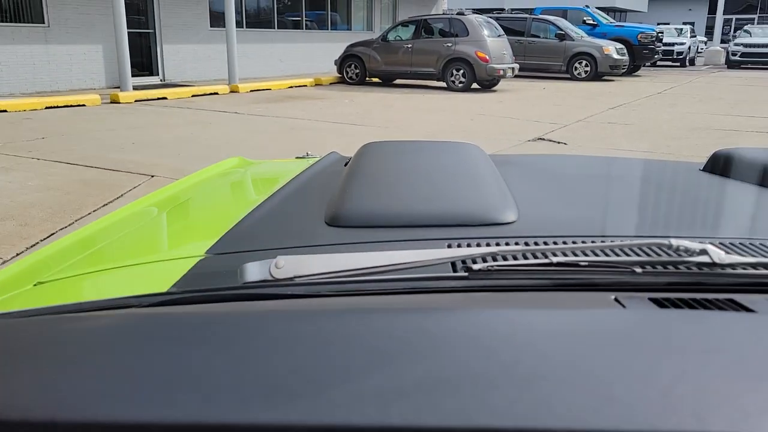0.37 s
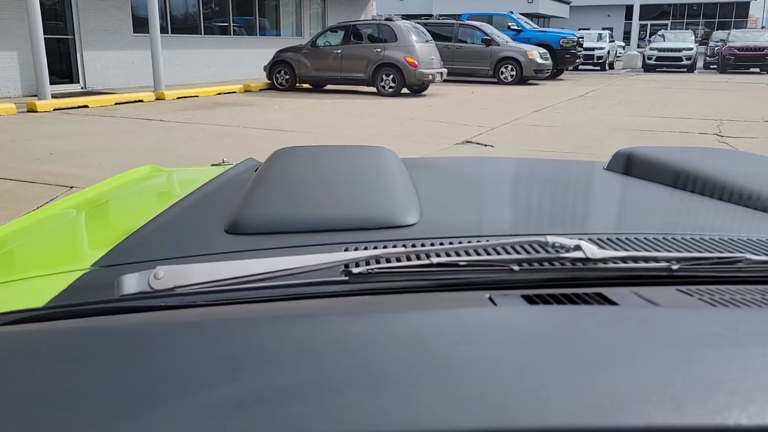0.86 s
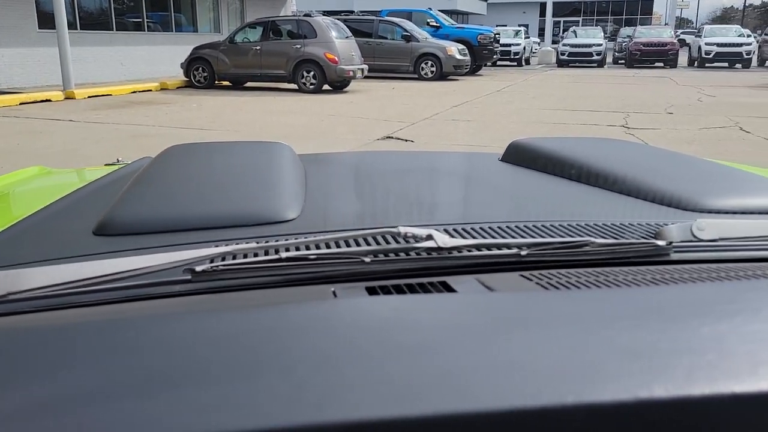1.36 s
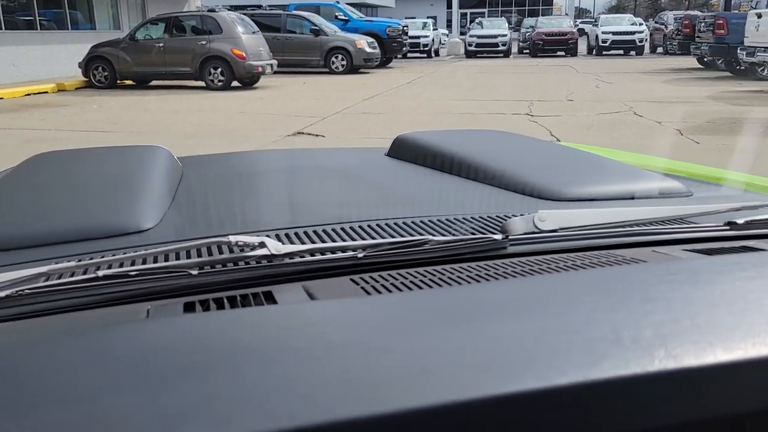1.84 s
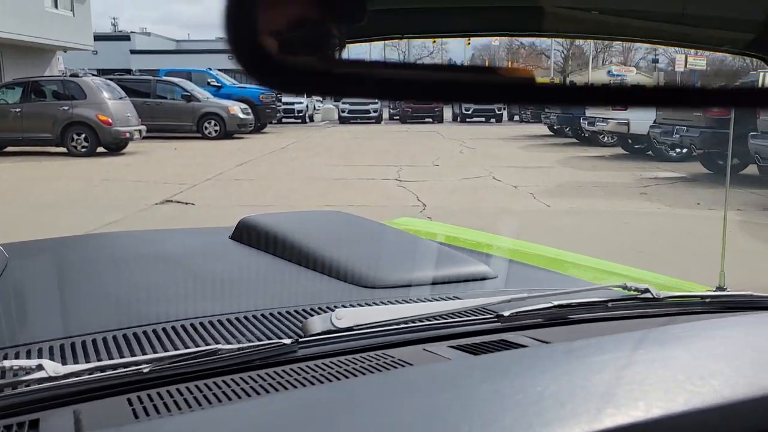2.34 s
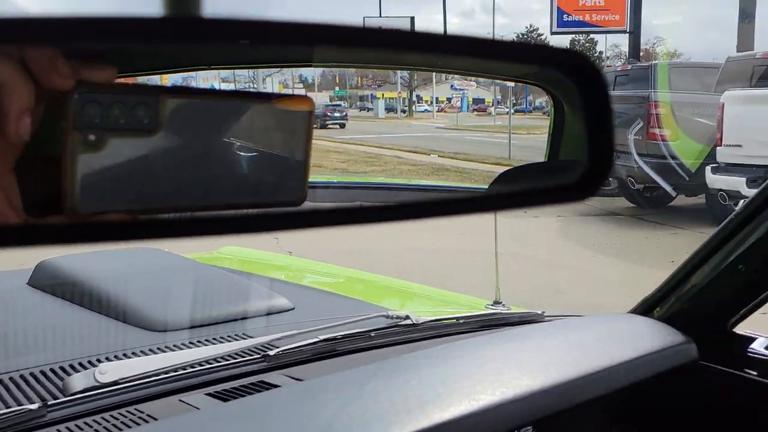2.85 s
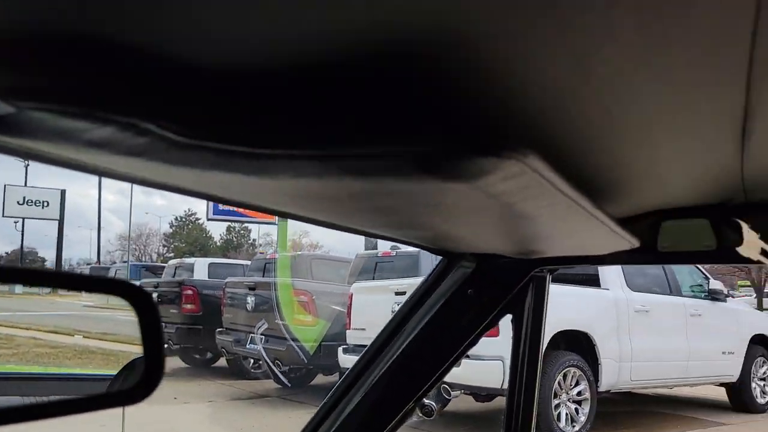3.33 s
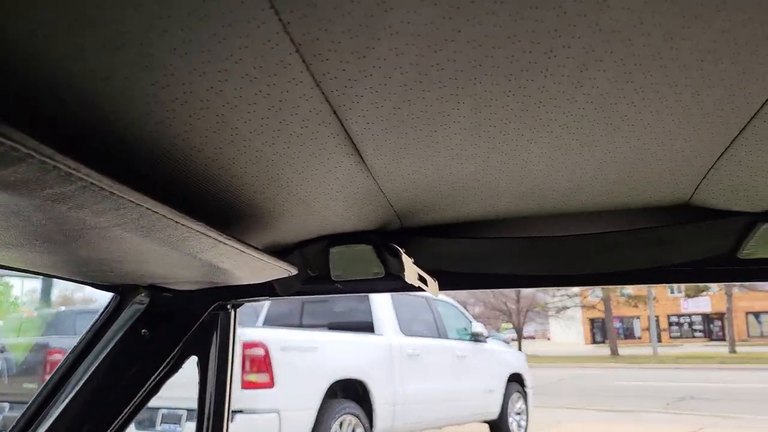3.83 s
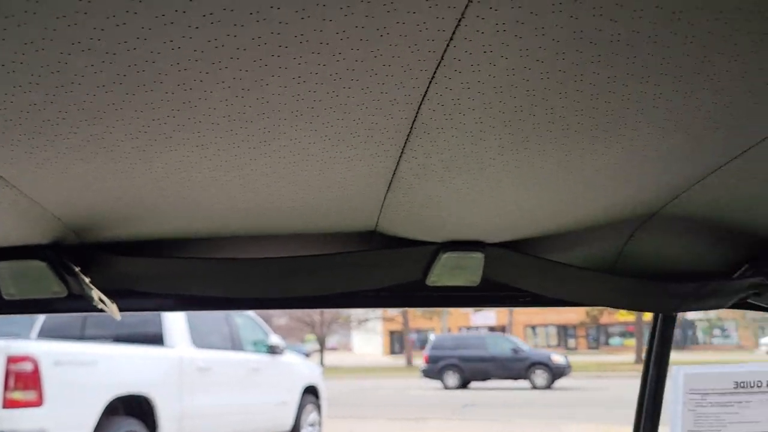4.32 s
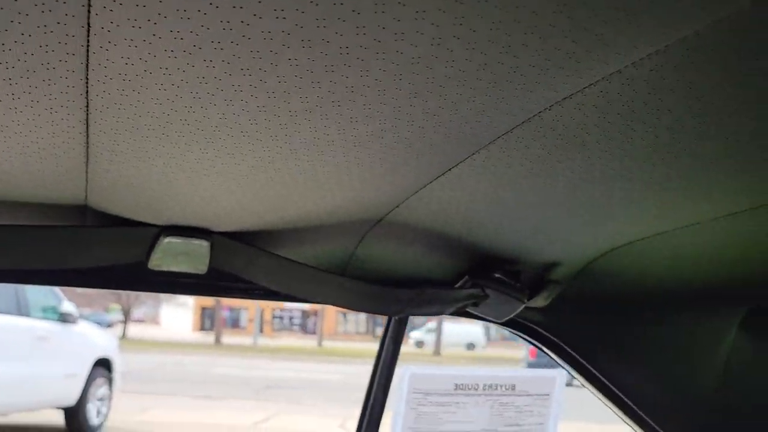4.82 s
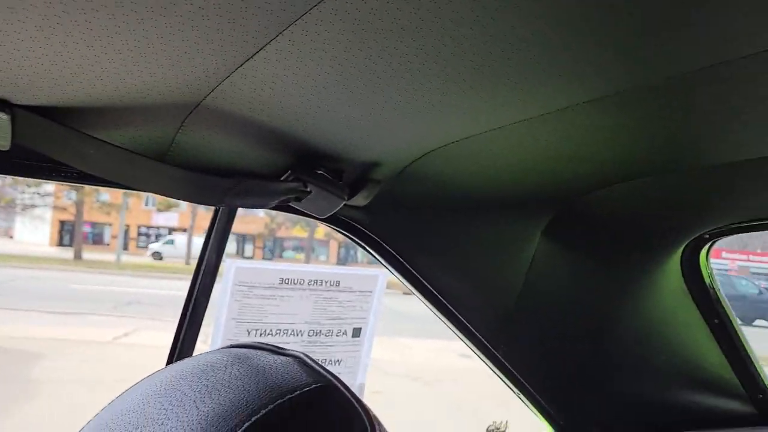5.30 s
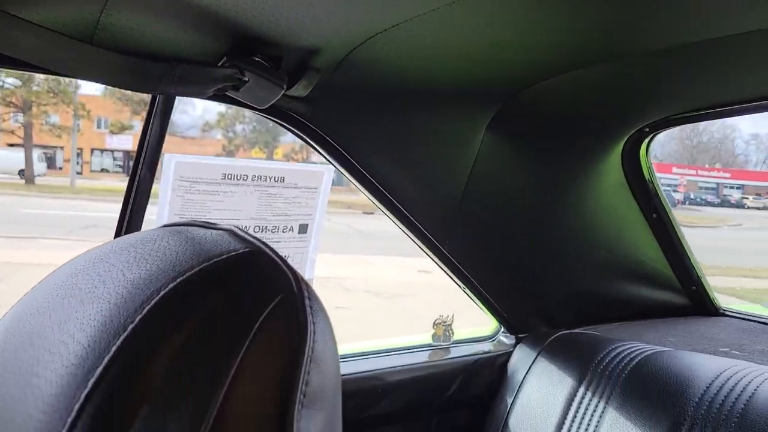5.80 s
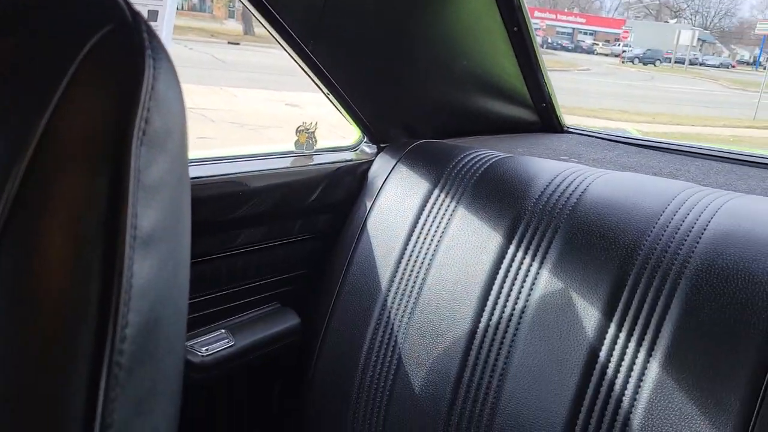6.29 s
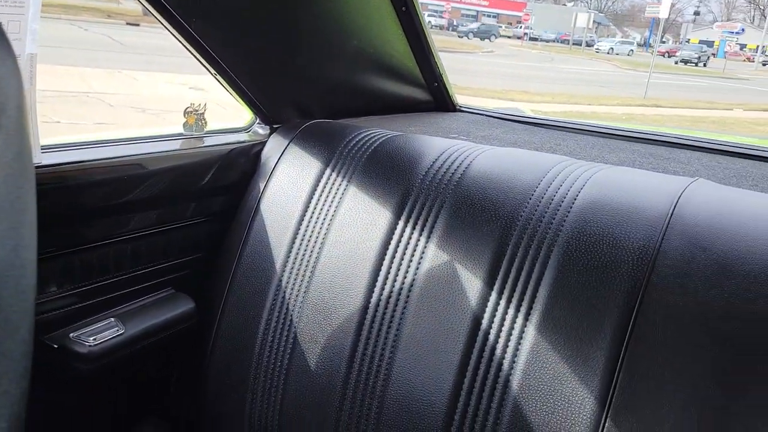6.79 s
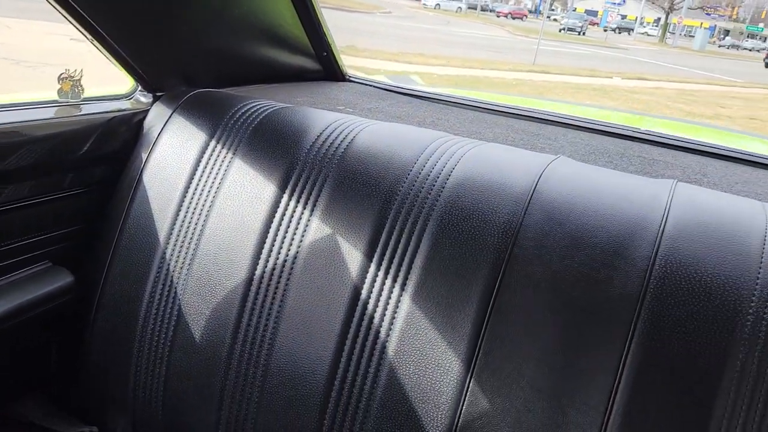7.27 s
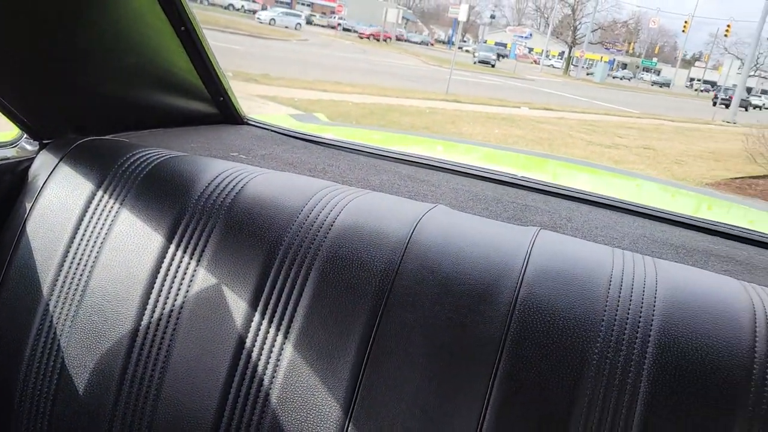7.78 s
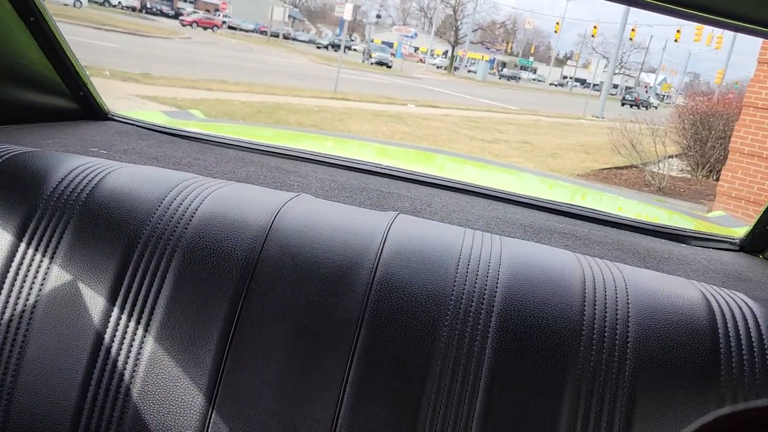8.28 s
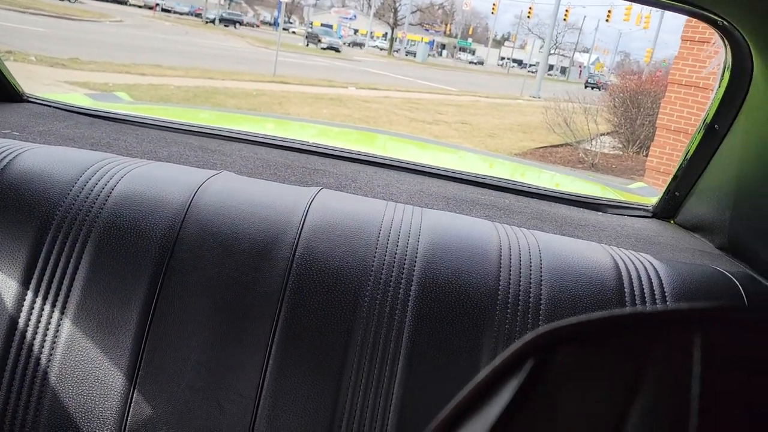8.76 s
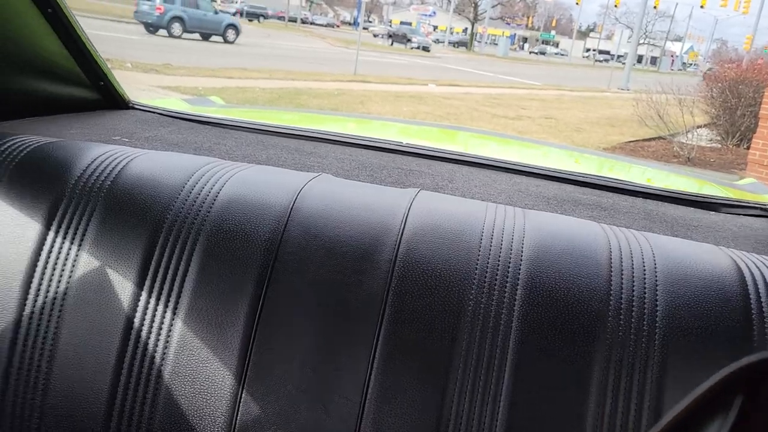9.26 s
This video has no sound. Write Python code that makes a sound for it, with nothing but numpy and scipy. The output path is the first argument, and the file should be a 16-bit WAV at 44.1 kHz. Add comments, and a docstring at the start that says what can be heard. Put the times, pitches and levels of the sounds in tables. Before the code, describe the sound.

A close, bass-heavy V8 idle fills the cabin of a parked older car from start to finish, heard on a hand-held stereo phone at the driver's seat. At 0 s it is fast, cold and slightly harsh, a firing tone near 100 Hz with uneven throbs; by about 2 s it drops to around 91 Hz and becomes lumpier, with a deeper half-rate boom, then drifts slightly up and down, dipping near 6 and after 8.5 s. Muffled fan and valve noise swells gently underneath. A faint seat rub comes at 1 s, a dry trim tick at 2.1, a barely audible far horn from 2.2 to 2.7. Cloth brushes at 2.9, 4.1, 5.7, 7.2, 8.7 and 9.2; a grainy vinyl rub with small knocks lands near 4.2, another knock at 8.8. Soft tyre hiss passes around 6.8 and 8.6. The idle continues to the end, about 9.4 s.

```python
"""Cold V8 at fast idle, from the driver's seat

Heard on a hand-held phone that turns from windscreen to rear bench, one port leading as it turns.
Exhaust: sines at orders of the eight-cylinder cycle, plus uneven blows ringing the cabin air.
Engine bay, street, sleeve and seat vinyl: shaped noise. Trim tick: decaying modes. Far horn: held
sine partials. Passing cars: swells of tyre hiss."""
import sys
import numpy as np
from scipy import signal
from scipy.fft import rfft, irfft, next_fast_len
from scipy.io import wavfile
from scipy.ndimage import uniform_filter1d, minimum_filter1d, map_coordinates

SR = 44100
rng = np.random.default_rng(int(sys.argv[2]) if len(sys.argv) > 2 else 0)


def unload_wav(signal):
    """Save mono or channel-first audio to the path in sys.argv[1] as 16-bit WAV at rate SR, clipped to [-1, 1]."""
    wavfile.write(
        sys.argv[1],
        SR,
        np.round(np.clip(np.atleast_2d(signal).T, -1, 1) * 32767).astype(np.int16),
    )


def attenuation_scalar(level_db):
    """Turn a level in dB into a linear amplitude multiplier (20 dB per decade)."""
    decades = np.asarray(level_db, float) / 20
    return 10 ** decades


N = 413658
TIME = np.arange(N) / SR
# relative colour of engine-bay and tyre noise: (frequency [Hz], density [dB per Hz])
BAY_COLOUR = [(330, -36), (400, -27.5), (550, -32), (680, -34.5), (740, -33.5), (950, -39), (1500, -42),
              (1890, -42), (1970, -40.5), (2060, -44), (3300, -47.5), (3800, -53), (6500, -55.5),
              (7800, -67)]


def curves(table):
    """Columns of a time table, one value per sample."""
    s, *columns = np.transpose(table)
    return [np.interp(TIME, s, column) for column in columns]


def shape(table, hz):
    """A (Hz, value) table read on a log-frequency axis."""
    f, v = np.transpose(table)
    return np.interp(np.log(np.maximum(hz, 1)), np.log(f), v)


def filtered(x, gain):
    """Apply gain(Hz) to the spectrum; mirrored ends keep start and finish apart."""
    size = next_fast_len(N + SR // 5)
    lead = (size - N) // 2
    wide = np.pad(x, (lead, size - N - lead), mode="reflect")
    hz = np.arange(size // 2 + 1) * SR / size
    return irfft(rfft(wide) * gain(hz), size)[lead:lead + N]


def unit(x):
    """Scale to rms 1."""
    return x / np.sqrt(np.mean(x ** 2))


def walk(rate_hz):
    """Random levels held 1 / rate_hz and slewed twice; rms 1."""
    k = int(SR / rate_hz)
    steps = np.repeat(rng.standard_normal(N // k + 1), k)
    return unit(uniform_filter1d(uniform_filter1d(steps, k), k)[:N])


def bump(s, length_s):
    """Bell-shaped swell centred on s, length_s wide at 1/e."""
    return np.exp(-(2 * (TIME - s) / length_s) ** 2)


def sides(pan_db):
    """Gains of the two ports for a left minus right level."""
    return attenuation_scalar(np.array([pan_db, -pan_db]) / 2)


def ports(x):
    """One wave reaches the two ports at slightly different times as the phone turns."""
    # (time [s], left port lead [ms])
    turn = [(0, 0.44), (1, 0.31), (3, 0.33), (4, -0.025), (6.5, -0.37), (8, -0.43)]
    half_lead = curves(turn)[0] * SR / 2000  # samples
    return np.array([map_coordinates(x, [np.arange(N) + side * half_lead], order=3, mode="mirror")
                     for side in (1, -1)])


def cabin(x):
    """The cabin smears a sound into a short tail; towards the treble the ports hear unlike reflections."""
    t60_s, alike_hz = .2, 280
    t = TIME[:SR // 2]
    tails = rng.standard_normal((3, len(t))) * np.exp(-np.log(1000) * t / t60_s)
    common, left, right = (signal.fftconvolve(x, tail)[:N] for tail in tails)
    unlike = lambda f: f / np.sqrt(f ** 2 + alike_hz ** 2)
    alike = ports(filtered(common, lambda f: np.sqrt(1 - unlike(f) ** 2)))
    return unit(alike + np.array([filtered(left, unlike), filtered(right, unlike)]))


def noise(colour, lo_hz, hi_hz):
    """Coloured noise in one range, part from one side and part diffuse; rms 1."""
    # power from one side rather than all round: (frequency [Hz], share [0-1])
    direct_share = [(400, 0.74), (1000, 0.39), (2500, 0.16), (6000, 0.1), (14000, 0.05)]
    direct = lambda f: np.clip(shape(direct_share, f), 0, 1)
    diffuse = lambda f: 1 - direct(f)
    edge = lambda f: 1 / np.sqrt((1 + (lo_hz / (f + 1)) ** 16) * (1 + (f / hi_hz) ** 16))

    def band(share):
        gain = lambda f: attenuation_scalar(shape(colour, f)) * edge(f) * np.sqrt(share(f))
        return filtered(rng.standard_normal(N), gain)
    return unit(ports(band(direct)) + np.array([band(diffuse) for _ in range(2)]))


def exhaust(uneven_db, slip_rad, drone_slip_rad, echo_db):
    """Orders of the two-turn cycle; uneven burning lets each waver in size and timing."""
    # (time [s], firing rate [Hz])
    speed = [(0.05, 99.5), (0.8, 98), (1.1, 95.8), (2.0, 91.7), (2.3, 91.6), (2.6, 89.7), (3.8, 90.8),
             (4.1, 89.9), (4.4, 91.1), (5.0, 91.4), (5.6, 89.6), (5.9, 87.8), (6.2, 87.4), (6.5, 89.6),
             (7.4, 91.6), (8.0, 90.7), (8.6, 87.3), (9.3, 87.3)]
    # cabin resonances at the phone: (time [s], firing tone [dB], nominal one-bank boom [dB],
    # floor-pan drone lift [dB], ringing panel [Hz], panel lift [dB])
    idle = [(0.1, -12.7, -29, 0, 280, 3), (1.4, -11.6, -24, 0, 272, 5), (2.2, -10.9, -20.5, 2, 268, 14),
            (2.7, -12.3, -17, 3, 266, 14), (4.4, -13, -16, 0, 266, 6), (5.3, -12.9, -16, -1, 262, 3),
            (6.1, -13.4, -16.5, -1, 262, 5), (7.3, -11.9, -17.5, -1, 262, 7), (8.4, -13.4, -16, 0, 273, 10),
            (9.0, -13.3, -17.5, 1, 275, 14)]
    # weaker harmonics from uneven cylinders: (order of cycle, level once settled [dB])
    cycle_orders = [(3, -37), (5, -26), (6, -37.5), (7, -38.5), (9, -31.5), (10, -41.5), (11, -40.5),
                    (12, -40), (13, -38), (14, -45), (15, -42.5), (16, -42)]
    # orders 17-34 through floor pan and pipes: (level at fast idle [dB], level once settled [dB])
    drone_orders = [(-35.5, -46.5), (-43, -49.5), (-40, -42.5), (-47.5, -44.5), (-27.5, -48), (-40, -45),
                    (-39, -41), (-39, -44.5), (-50.5, -45), (-42.5, -48.5), (-44, -48), (-38.5, -43.5),
                    (-37.5, -40.5), (-54, -49.5), (-55.5, -52.5), (-59, -56), (-58.5, -57.5),
                    (-53.5, -56.5)]
    # orders that show while cold: (order, level at fast idle [dB], level once settled [dB])
    upper_orders = [(36, -45, -58), (44, -50, -60), (45, -50, -60)]
    # uneven blows after pipes and floor pan: (frequency [Hz], relative density [dB per Hz])
    blow_colour = [(25, -21), (45, -5), (100, 1.5), (130, -11), (220, -7.5), (262, -5), (330, -10),
                   (420, -24.5), (700, -60.5)]
    # cabin air modes: (centre [Hz], half width [Hz], level once settled [dB], lift at fast idle [dB])
    air_modes = [(42, 2, -33, 3), (97, 3, -35, 0)]
    # (time [s], left minus right level of the boom [dB])
    lean = [(0.05, -0.5), (1.2, -2.3), (3.2, -0.8), (4.9, -2.1), (7.5, -2.3), (8.7, -1.6), (9.3, -1.8)]
    settled_hz, fast_hz, cold_hz = 91.4, 94.3, 96.7  # highest orders fully out above cold_hz
    hunt_share, panel_half_width_hz = .002, 9.4
    pipe_bend_rad = 1.48  # times order squared: the pipes delay each order differently
    bank_side_share = .1  # lowest boom fills the right port a little more

    hz = curves(speed)[0] * (1 + hunt_share * walk(5))
    firing_db, bank_db, drone_db, ring_hz, ring_db = curves(idle)
    fast = np.clip((hz - settled_hz) / (fast_hz - settled_hz), 0, 1)
    cold = np.clip((hz - settled_hz) / (cold_hz - settled_hz), 0, 1)
    cycle = 2 * np.pi * np.cumsum(hz) / SR / 8

    def order(k, db, waver_rad, rate_hz):
        # body paths scramble phases above order 9, but orders 20-25 ring together once a cycle
        start = 0
        if k < 20 or k > 25:
            start = pipe_bend_rad * k ** 2 + (k > 9) * 2 * np.pi * rng.random()
        return np.sqrt(2) * attenuation_scalar(db) * np.cos(k * cycle + start + waver_rad * walk(rate_hz))

    # a harder-working bank of four raises its boom and lowers the even firing tone
    tilt = walk(13) + .7 * walk(6)
    tilt = unit(tilt - uniform_filter1d(tilt, SR // 2))  # evens out within half a second
    firing_tone = order(8, firing_db - tilt + .5 * walk(9), .15, 9)
    bank = order(4, bank_db - 1 - fast + (2.3 + 1.5 * fast) * tilt, .15, 7)
    # the fast, cold engine burns more harshly: orders above 6 stand out
    uneven = sum(order(k, db + 2.0 * fast * (k > 6) + uneven_db * walk(4), slip_rad, 6)
                 for k, db in cycle_orders)

    drone = 0
    for k, fast_db, slow_db in [(k, *row) for k, row in enumerate(drone_orders, 17)] + upper_orders:
        haste = cold if k > 32 else fast
        panel_db = ring_db * np.exp(-((k * hz / 8 - ring_hz) / panel_half_width_hz) ** 2)
        db = slow_db + haste * (fast_db - slow_db) + drone_db + panel_db + 2 * walk(4)
        drone = drone + order(k, db, drone_slip_rad * k / 24, 4)
    drone = ports(drone) + attenuation_scalar(echo_db) * np.std(drone) * cabin(drone)

    # each firing hits with its own strength, which fills the gaps between the orders
    firing = (cycle * 8 / (2 * np.pi)).astype(int)
    blows = np.diff(firing, prepend=0) * rng.standard_normal(N // 100)[firing]
    rumble = unit(filtered(blows, lambda f: attenuation_scalar(shape(blow_colour, f))))
    echoes = attenuation_scalar(-30.5 + 1.4 * cold + 0.22 * drone_db) * cabin(rumble)
    air = 0
    for mode_hz, width_hz, db, lift_db in air_modes:
        mode = filtered(blows, lambda f: 1 / (1 + ((f - mode_hz) / width_hz) ** 2))
        air = air + attenuation_scalar(db + lift_db * cold) * unit(mode)

    boom = firing_tone + bank + uneven + air + attenuation_scalar(-30.5 + 3.7 * cold + 0.6 * drone_db) * rumble
    pan_db, = curves(lean)
    bank_offset = bank_side_share * np.array([[-1], [1]]) * bank
    return ports(boom) * sides(pan_db) + bank_offset + drone + echoes, cycle, fast


def engine_bay(cycle, fast, throb_db, flicker_db):
    """Fan, intake and valve gear through the bulkhead, with traffic: noise throbbing with the cycle."""
    # ranges, rumble to valve clatter: (base level [dB], lift at fast idle [dB], share of swell [0-1])
    bay = [(-40.5, -0.5, 0.2), (-43, 3, 0.8), (-42, 1.5, 0.94), (-47.5, 2.5, 0.2), (-52.5, 0, .5)]
    # edges of those ranges [Hz]
    edges_hz = (345, 620, 950, 2300, 3600, 9000)
    # bay and street swell as the phone moves through the cabin: (time [s], full swell [dB])
    swell = [(0, 3.5), (1.5, 0.5), (2.8, 3), (3.45, -1), (4.7, 3), (5.6, -0.5), (6.7, -1.5), (7.6, 1),
             (8.2, 4), (9.38, 3.5)]
    throb = throb_db * np.sin(cycle + walk(3))
    swell_db, = curves(swell)
    out = 0
    for (db, fast_db, share), lo_hz, hi_hz in zip(bay, edges_hz, edges_hz[1:]):
        level_db = db + fast_db * fast + share * swell_db + throb + flicker_db * walk(16)
        out = out + attenuation_scalar(level_db) * noise(BAY_COLOUR, lo_hz, hi_hz)
    return out


def cloth(flicker_db):
    """Sliding fabric: fine hiss and coarser scrape as two noise bands sharing a random flutter."""
    # steady sleeve brushing: (time [s], hiss level [dB], left minus right level [dB])
    sleeve = [(0, -56, 2), (2.3, -58.5, -0.5), (3.5, -61.5, -1), (6.4, -55, -3.5), (7.5, -55.5, -7),
              (8.9, -52, -5), (9.38, -53.5, -8.5)]
    # separate rubs against the phone: (time [s], length [s], hiss level [dB], scrape level [dB],
    # left minus right level [dB])
    rustle = [(2.864, 0.29, -46, -56, -2), (4.084, 0.24, -54, -51, -1), (5.744, 0.58, -63.5, -52, -0.5),
              (7.228, 0.37, -55, -50.5, 2.5), (8.662, 0.14, -53.5, -60, -1.5),
              (9.204, .3, -55.5, -65, -3.5)]
    # (frequency [Hz], relative density [dB per Hz])
    cloth_colour = [(2350, -37.5), (4380, -9), (5990, -10), (8430, -15), (10900, -9), (12800, -4.5),
                    (15600, -8)]
    # scrape from first to second edge, hiss from second to third [Hz]
    edges_hz = (3600, 7500, 18000)
    sleeve_scrape_db = -0.5  # relative to its hiss
    db, pan_db = curves(sleeve)
    hiss_power = (attenuation_scalar(db) * sides(pan_db)) ** 2
    scrape_power = hiss_power * attenuation_scalar(sleeve_scrape_db) ** 2
    for s, length_s, hiss_db, scrape_db, pan_db in rustle:
        rub = (sides(pan_db)[:, None] * bump(s, length_s)) ** 2
        hiss_power = hiss_power + attenuation_scalar(hiss_db) ** 2 * rub
        scrape_power = scrape_power + attenuation_scalar(scrape_db) ** 2 * rub
    lo_hz, mid_hz, hi_hz = edges_hz
    flutter = attenuation_scalar(flicker_db * walk(28))
    scrape = np.sqrt(scrape_power) * noise(cloth_colour, lo_hz, mid_hz)
    hiss = np.sqrt(hiss_power) * noise(cloth_colour, mid_hz, hi_hz)
    return flutter * (scrape + hiss)


def vinyl(grain_db, apart):
    """Seat vinyl: grainy bursts of band-passed noise, partly unlike at the two ports."""
    # rubs and short knocks as the driver turns: (time [s], length [s], level [dB], lowest [Hz],
    # highest [Hz])
    rubs = [(1.04, .14, -45, 2950, 3450), (4.17, .24, -37.5, 800, 2100), (4.115, .03, -41, 500, 1900),
            (4.258, .025, -40, 600, 1800), (8.803, .03, -42, 1400, 1800)]
    grain = rng.standard_normal((3, N)) * attenuation_scalar(grain_db * walk(70))
    grain = (grain[0] + apart * grain[1:]) / np.hypot(1, apart)
    out = 0
    for s, length_s, db, lo_hz, hi_hz in rubs:
        bandpass = signal.butter(3, (lo_hz, hi_hz), "bandpass", fs=SR, output="sos")
        out = out + attenuation_scalar(db) * bump(s, length_s) * unit(signal.sosfilt(bandpass, grain))
    return out


def trim():
    """A short tick rings the trim's modes, each decaying exponentially."""
    # (time [s], level [dB])
    ticks = [(2.104, -33)]
    # modes: (frequency [Hz], relative level [dB], t60 [s])
    modes = [(1373, -1, .05), (1700, -4, .025), (2780, 1, .03), (3343, -4, .04), (5000, -10, .015)]
    out = 0
    for s, db in ticks:
        t = np.maximum(TIME - s, 0)
        out = out + attenuation_scalar(db) * sum(attenuation_scalar(g) * np.exp(-np.log(1000) * t / t60) * np.sin(2 * np.pi * f * t)
                                  for f, g, t60 in modes)
    return out


def horn():
    """Upper partials of one far held note, each swelling briefly."""
    # (multiple of pitch, level at mid-swell [dB], time of its swell [s])
    partials = [(3, -56, 2.43), (4, -59, 2.38), (7, -55, 2.35), (8, -56, 2.46), (9, -58, 2.63),
                (11, -63, 2.46)]
    start_s, end_s, pitch_hz = 2.24, 2.7, 418
    swell_db, swell_s = 10, .15
    on = np.clip(np.minimum(TIME - start_s, end_s - TIME) / .03, 0, 1)
    out = 0
    for k, db, s in partials:
        level_db = db + swell_db * (bump(s, swell_s) - .5) + 2 * walk(20)
        out = out + attenuation_scalar(level_db) * np.sin(2 * np.pi * k * pitch_hz * TIME)
    return on * out


def cars():
    """Passing cars: a band of tyre hiss swells and fades for each."""
    # (time [s], length [s], level [dB], hiss centre [Hz])
    passes = [(6.793, 1.7, -40, 757), (8.6, 1.2, -40.5, 640)]
    spread = 1 + .5 / 2  # band edges at centre / spread and centre * spread
    return sum(attenuation_scalar(db) * bump(s, length_s) * noise(BAY_COLOUR, hz / spread, hz * spread)
               for s, length_s, db, hz in passes)


def scene():
    """All sources summed at the two ports."""
    boom, cycle, fast = exhaust(uneven_db=2, slip_rad=.3, drone_slip_rad=.22, echo_db=-9.0)
    bay = engine_bay(cycle, fast, throb_db=0.5, flicker_db=1.0)
    sleeve = cloth(flicker_db=1.2)
    seat = vinyl(grain_db=2.5, apart=.8)
    return boom + bay + sleeve + seat + trim() + horn() + cars()


def limiter(x):
    """Turn the gain down just around peaks over the ceiling."""
    ceiling_db, move_s = -1.6, .012
    k = int(move_s * SR)
    gain = np.minimum(1, attenuation_scalar(ceiling_db) / (np.abs(x).max(axis=0) + 1e-9))
    return x * uniform_filter1d(minimum_filter1d(gain, k), k)


def roll_off(x):
    """The treble ends steeply here."""
    return signal.sosfilt(signal.butter(12, 15720, fs=SR, output="sos"), x)


def record(dry):
    """The phone reshapes the left-right difference, colours each port by its duct, then limits."""
    # (frequency [Hz], lift of the left-right difference [dB])
    widen = [(60, -1), (250, 5), (600, 4.5), (1200, 5.5), (2500, 1), (15000, 0.5)]
    # the ports' unlike ducts: (frequency [Hz], left minus right level [dB])
    ducts = [(150, 0), (300, -0.4), (800, -1), (1500, 1.5), (2800, 0.9), (5000, -5), (9000, 7),
             (13000, 0.5)]
    mid = (dry[0] + dry[1]) / 2
    side = filtered((dry[0] - dry[1]) / 2, lambda f: attenuation_scalar(shape(widen, f)))
    left = filtered(mid + side, lambda f: attenuation_scalar(shape(ducts, f) / 2))
    right = filtered(mid - side, lambda f: attenuation_scalar(-shape(ducts, f) / 2))
    mix = limiter(np.array([left, right]))
    return roll_off(mix)


dry = scene()
out = record(dry)
unload_wav(out)
```